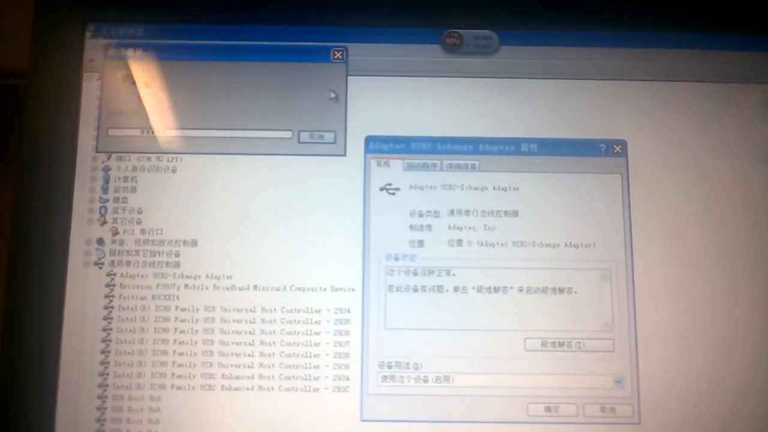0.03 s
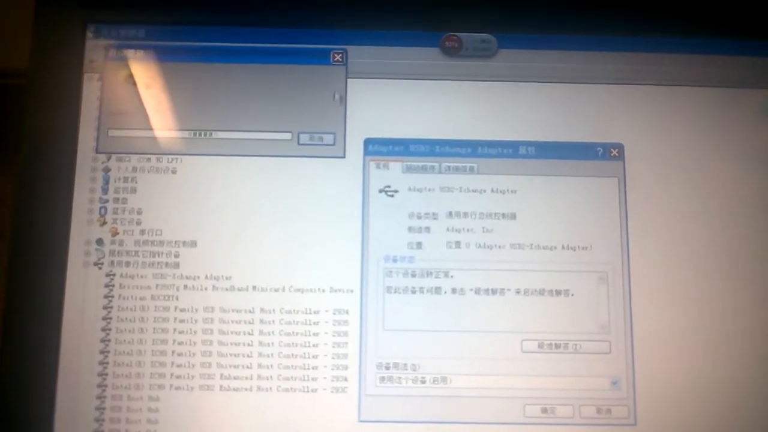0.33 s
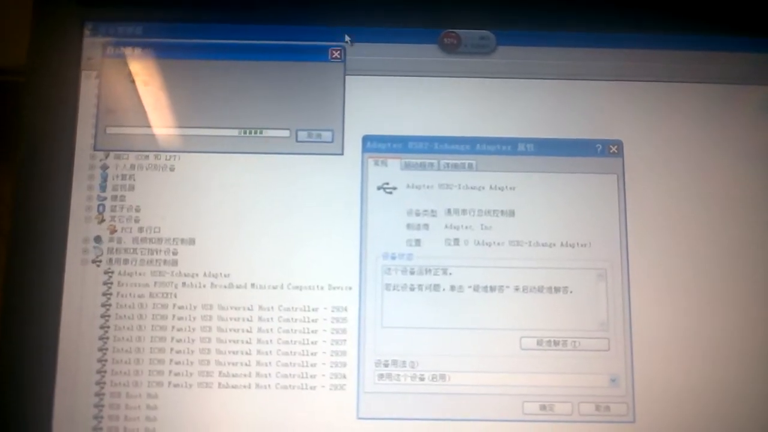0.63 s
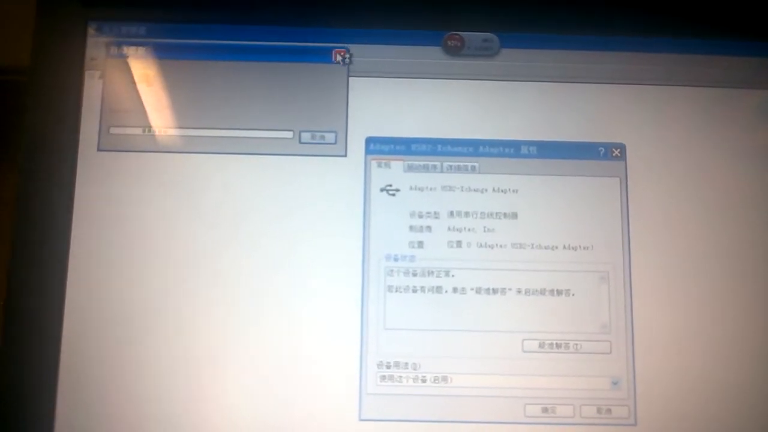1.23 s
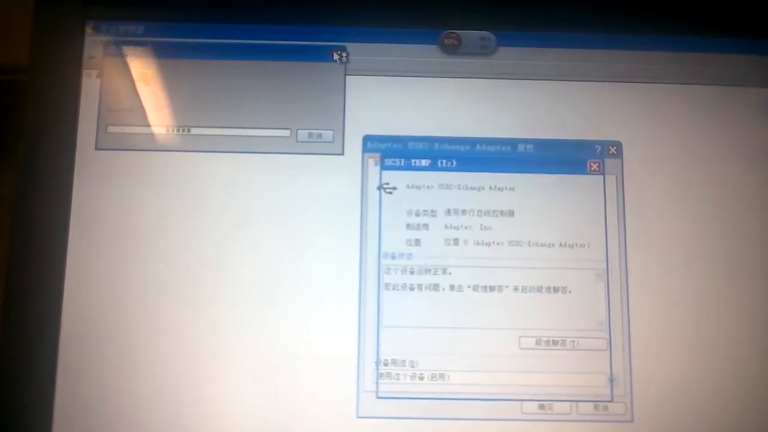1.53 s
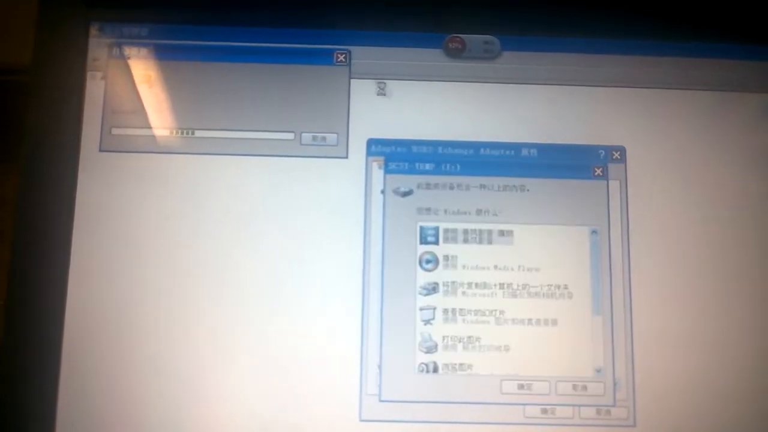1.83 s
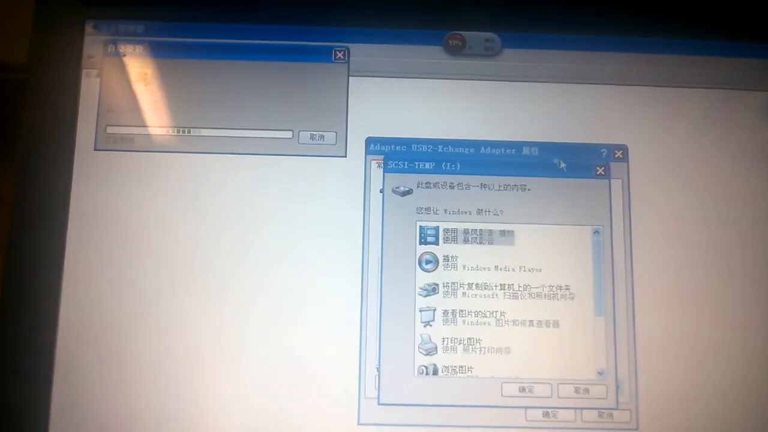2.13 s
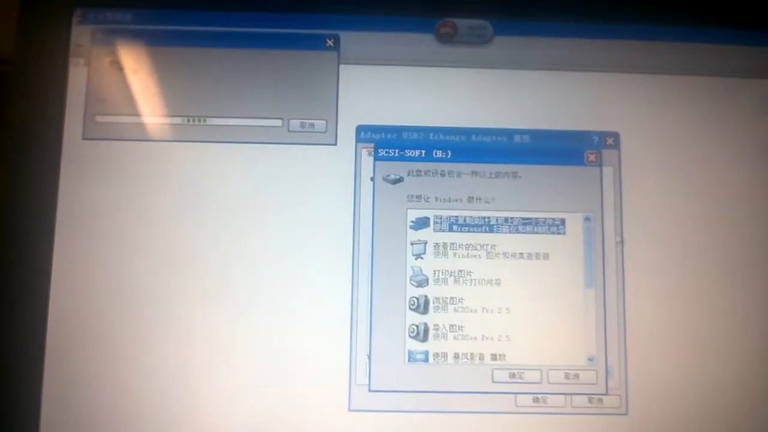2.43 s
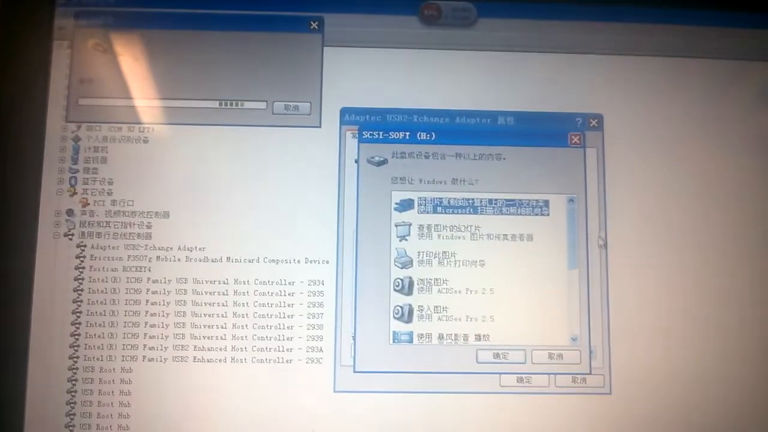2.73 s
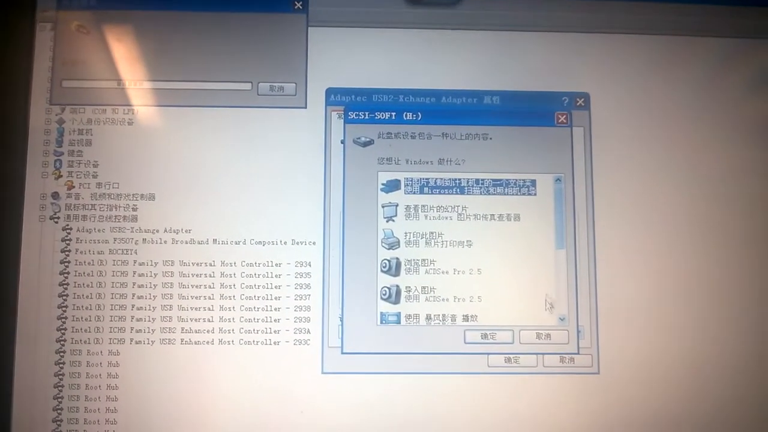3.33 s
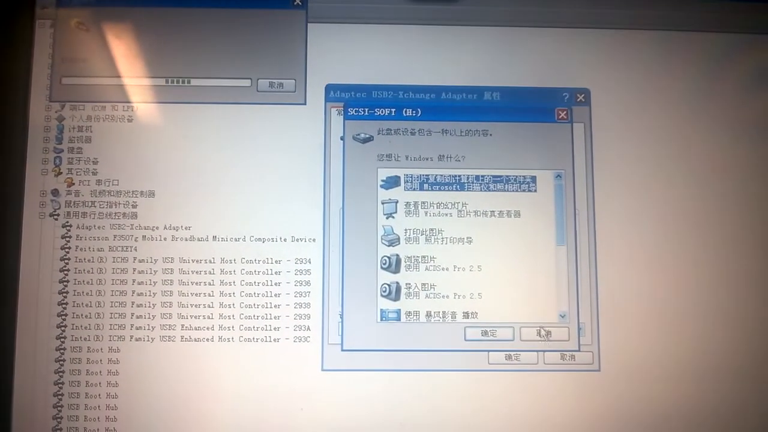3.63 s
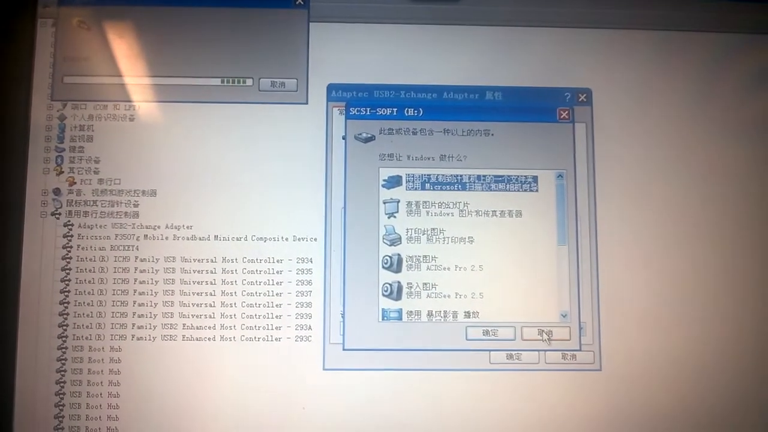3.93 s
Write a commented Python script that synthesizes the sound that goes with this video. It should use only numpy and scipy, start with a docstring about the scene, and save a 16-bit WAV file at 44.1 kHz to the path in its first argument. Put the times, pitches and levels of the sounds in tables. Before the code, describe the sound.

Computer hard disks spin with thin, pulsing whines over fan air and hum in a small room. One disk seeks in irregular rasping ticks with soft thumps, rests briefly, resumes, and ends in a dense, droning rattle.

```python
"""A computer with several hard disks runs in a small room: hum, fan air, thin beating spindle whines.
From the start one disk's heads seek in irregular bursts, each seek a tiny rasp and a soft case thump.
In the first half second something ticks, scuffs and squeaks thinly. Near 1.5 s the heads rest and
two faint clicks follow, the first with a soft knock. Scattered seeks resume at 2.1 s; from 3.6 s a
dense run shakes the case into a low drone."""
import sys
import numpy as np
from scipy import signal
from scipy.fft import rfft, irfft
from scipy.io import wavfile

SR = 44100
rng = np.random.default_rng(int(sys.argv[2]) if len(sys.argv) > 2 else 0)


def inscribe(sig):
    """Save sig as 16-bit PCM at rate SR to the path in sys.argv[1].

    A 1-D sig is mono; a 2-D sig holds one channel per row.
    Samples are clipped to [-1, 1] before scaling.
    """
    pcm = np.round(np.clip(np.atleast_2d(sig).T, -1, 1) * 32767)
    wavfile.write(sys.argv[1], SR, pcm.astype(np.int16))


N = 176400
T = np.arange(N) / SR
TURN_HZ, BAND_LIMIT_HZ = 90.18, 15720

# fan and platter air: freq_hz, density_db
AIR_SPECTRUM = [(20, -84.5), (45, -89), (90, -95.5), (210, -94), (280, -101), (450, -103), (620, -99),
                (780, -98), (950, -104), (1100, -102), (1800, -109), (2700, -108), (3300, -102),
                (3800, -94), (4150, -92.5), (4500, -100), (4900, -108), (5700, -110), (6400, -110),
                (7400, -108), (8000, -106), (9000, -106.5), (10000, -110), (11000, -112), (11800, -118),
                (13500, -114), (15500, -115.5)]
# throbbing hiss: freq_hz, gain_db
THROB_SPECTRUM = [(4500, -53), (5700, -13), (6400, -8), (7300, -10), (7700, -6), (9000, -47.5)]
# disks at nearly equal speed: beat_hz, swell_at_s, twin_gain_db, [(pitch_hz, level_db)]
WHINE_PAIRS = [(3.33, .017, -3.9, [(4058.15, -57.3), (4253.5, -71.5)]), (5.97, .073, -4.8, [(6912, -79.5),
               (7231, -78.5), (7304.68, -67.6), (7450, -79)]), (6.69, .055, -12, [(7973, -78.5),
               (8059, -77), (8116.3, -74.8)]), (2.08, .18, -8, [(8675.97, -69.2), (8927.9, -74.6)]),
               (8.05, .04, -13, [(9738, -80), (9834, -83)]), (10.84, .025, -13, [(9943, -84.5),
               (10020, -76.8)]), (5.26, .053, -12, [(6508, -81.5), (14610, -87)])]
# motor and bearing whines: pitch_hz, level_db
LONE_WHINES = [(2067, -85), (2790, -84.5), (2890, -86), (4870, -85), (6380, -83.5), (7607, -82.5),
               (10541, -83.5), (12139, -90.5), (12166, -89), (12242, -89.5), (12974, -91), (13076, -90),
               (14104, -91)]
# high harmonics of the platter rate: pitch_hz, level_db
OVERTONE_LEVELS = [(5500, -97), (7000, -91.5), (9300, -92), (11000, -96), (12500, -102), (13800, -96.5),
                   (15600, -98)]
# treble of the whir: time_s, gain_db
TREBLE_GAIN = [(0, 0), (.55, -1), (.7, 1), (.82, -1), (.89, -6), (.95, -2), (1.01, -6), (1.12, 0),
               (1.26, 1), (1.35, -6), (1.47, 0), (1.76, 0), (1.84, -8), (1.92, -1), (2.18, 0), (2.27, -2),
               (2.34, -7), (2.43, 0), (2.6, 2), (2.76, 1), (2.83, -8), (2.91, 1), (3.15, 2.5), (3.33, -1),
               (3.45, 1.5), (3.7, 2), (4, 0)]
# case drone: time_s, level_db
DRONE_ENVELOPE = [(0, -73), (.3, -63.5), (.55, -77), (1.1, -82), (1.35, -65), (1.55, -84), (3.58, -81),
                  (3.68, -63), (3.79, -61), (3.88, -61.5), (4, -83)]
# soft knock: start_s, level_db, pitch_hz, rise_s
SOFT_KNOCK = (1.462, -63, 76, .016)
# ticks and clicks: start_s, level_db, centre_hz, decay_s
CLICK_EVENTS = [(.0412, -49.5, 12000, .0014), (.05, -59.5, 10500, .016), (1.4778, -50.8, 2700, .0022),
                (1.6305, -56.5, 4600, .0013)]
# scuffing: time_s, level_db
SCUFF_ENVELOPE = [(0, -57), (.06, -52), (.16, -59), (.24, -54.5), (.31, -57.5), (.4, -60.5), (.5, -73)]
# scuffing: freq_hz, gain_db
SCUFF_SPECTRUM = [(1500, -21), (2500, -18.5), (3000, -6.5), (4200, 3.5), (5200, -11), (7000, -20),
                  (15000, -20)]
# thin squeaks: jitter_ratio, [(time_s, pitch_hz, level_db)]
SQUEAK_GLIDES = [(0.0244, [(.035, 4450, -63), (.062, 4680, -51.5), (.073, 4420, -47), (.08, 4360, -72)]),
                 (.022, [(.068, 4970, -68), (.1, 5000, -59), (.15, 4970, -78)]),
                 (0.0084, [(.295, 4000, -59), (.33, 3820, -57), (.358, 3670, -50.5), (.385, 3480, -56),
                 (.42, 3230, -61), (.432, 3240, -71)])]
# drive shell response: freq_hz, gain_db
SHELL_RESPONSE = [(150, -30), (330, -3.5), (420, -21), (530, -11.5), (800, -20), (1100, -11), (1550, -9.5),
                  (1800, -23.5), (2550, -19), (2850, -11.5), (3400, -9), (3900, -1.9), (4350, 4.1),
                  (4750, -12), (5300, -11.5), (5700, -20), (6450, -10), (7200, -19), (9000, -19),
                  (10900, -19), (11800, -24.5), (12600, -35), (13400, -33), (15500, -53)]
# ring of the braking arm: freq_hz, gain_db
ARM_RESPONSE = [(9000, -40), (12600, -24), (13300, -4), (13950, 0), (14450, -4), (15500, -9)]
# case modes: pitch_hz, gain_db, t60_s
CASE_MODES = [(125.1, -17.5, 0.18), (149.5, -20, 0.096), (186.5, 5, 0.06), (222, -3.5, 0.1),
              (291, -12, 0.065), (342, -15, 0.14)]
# head seeks: start_s, drive_db, thump_db
HEAD_SEEKS = [(0.0187, -52, -73), (0.0269, -51, -66), (0.048, -56.5, -63), (0.0591, -50, -53),
              (0.0707, -51, -60), (0.0953, -54, -51), (0.1128, -53, -60), (0.1243, -57, -64),
              (0.1368, -48, -61), (0.1474, -50, -53), (0.1813, -50, -58), (0.189, -57, -70),
              (0.2, -51, -60), (0.21, -51, -67), (0.2248, -49.5, -67), (0.234, -55, -68),
              (0.2442, -52, -49.5), (0.2643, -49.5, -53), (0.2815, -59, -56), (0.292, -54, -57),
              (0.332, -50.5, -50), (0.3464, -50, -51), (0.3718, -53, -72), (0.427, -48.5, -62),
              (0.4427, -52.5, -61), (0.4521, -49, -62), (0.4699, -50.5, -55), (0.4812, -49, -65),
              (0.5612, -52, -55.5), (0.5726, -55, -73), (0.6034, -52.5, -60), (0.6111, -53, -55),
              (0.654, -50.5, -58.5), (0.702, -52.5, -52), (0.744, -54, -62), (0.7665, -54, -59),
              (0.7867, -51, -71), (0.7945, -55, -74), (0.822, -51, -66), (0.8395, -52.5, -57),
              (0.8522, -49.5, -54), (0.907, -50, -53.5), (0.9716, -49, -54), (0.9809, -50.5, -53.5),
              (1.04, -50.5, -75), (1.154, -49, -73), (1.1621, -54, -53), (1.1778, -50, -60),
              (1.1859, -55, -57), (1.1976, -48.5, -75), (1.2216, -51.5, -78), (1.233, -49, -52.5),
              (1.245, -47.5, -66), (1.282, -51, -68), (1.289, -51, -61), (1.2984, -48.5, -55.5),
              (1.3413, -51.5, -65), (1.3713, -51, -59), (1.4039, -50.5, -50.5), (2.112, -54, -66),
              (2.1209, -49.5, -50.5), (2.311, -49.5, -52), (2.465, -51.5, -55.5), (2.4867, -51, -68),
              (2.4996, -49, -79), (2.5102, -51.5, -64), (2.7027, -49.5, -54.5), (2.7167, -50, -62),
              (2.7276, -52, -75), (2.7422, -48.5, -72), (2.7706, -50.5, -64), (2.8362, -53.5, -60),
              (2.8522, -55, -69), (2.8705, -51, -68), (2.8921, -51, -58), (2.9372, -51.5, -55),
              (3.3488, -48.5, -82), (3.3559, -50.5, -54), (3.6125, -48.5, -56), (3.6225, -51, -56),
              (3.6342, -48.5, -53), (3.6477, -51, -61), (3.6625, -48, -59), (3.675, -51.5, -59),
              (3.687, -47, -53), (3.7019, -48.5, -58), (3.7176, -50, -55), (3.7307, -50.5, -53),
              (3.7403, -48, -58), (3.7583, -47, -57), (3.782, -52, -67), (3.795, -48.5, -66),
              (3.8081, -49.5, -57), (3.8223, -46.5, -57), (3.8392, -48.5, -60), (3.8543, -51, -49.5),
              (3.873, -49.5, -57), (3.887, -52.5, -64), (3.9302, -49, -66), (3.9468, -49, -56)]


def amp(db):
    return 10 ** (np.asarray(db) / 20)


def db_at_hz(curve, hz):
    freq_hz, db = np.transpose(curve)
    return np.interp(np.log(hz + 1), np.log(freq_hz + 1), db)


def db_over_time(curve, **ends):
    return np.interp(T, *np.transpose(curve), **ends)


def add(mix, start_s, sound):
    part = mix[max(round(start_s * SR), 0):][:len(sound)]
    part += sound[:len(part)]


def wander(cutoff_hz):
    """Smooth random motion, unit RMS."""
    hz = np.fft.rfftfreq(N, 1 / SR)
    motion = irfft(rfft(rng.standard_normal(N)) / (1 + (hz / cutoff_hz) ** 4) * (hz > 0), N)
    return motion / np.sqrt(np.mean(motion ** 2) + 1e-20)


def colour(x, spectrum, size=4096):
    """Minimum-phase filter, unit energy."""
    log_gain = np.log(amp(db_at_hz(spectrum, abs(np.fft.fftfreq(size, 1 / SR)))))
    impulse = np.fft.ifft(np.exp(np.conj(signal.hilbert(log_gain)))).real[:size // 2]
    return signal.oaconvolve(x, impulse / np.linalg.norm(impulse))[:N]


def tone(pitch_hz, level_db, drift_hz=.04, delay_s=0):
    """Sinusoid with slight pitch drift."""
    cycles = pitch_hz * (T - delay_s) + np.cumsum(drift_hz * wander(4.5)) / SR
    return np.sqrt(2) * amp(level_db) * np.cos(2 * np.pi * cycles)


def room(x, gain_db=-2.5, t60_s=.15):
    """Short diffuse tail from the case and nearby walls."""
    t = np.arange(16384) / SR
    tail = rng.standard_normal(len(t)) * (t > .003) * np.exp(-np.log(1000) * t / t60_s)
    return amp(gain_db) * signal.oaconvolve(x, tail / np.linalg.norm(tail))[:N]


def fans(swell_db=.2, hiss_db=-77):
    """Even rush of air, a clean hum, and hiss throbbing at the second whine pair's beat."""
    air_gain = amp(db_at_hz(AIR_SPECTRUM, np.fft.rfftfreq(N, 1 / SR))) * np.sqrt(SR / 2)
    air = irfft(rfft(rng.standard_normal(N)) * air_gain, N) * amp(swell_db * wander(15.6))
    hiss = amp(hiss_db) * colour(rng.standard_normal(N), THROB_SPECTRUM)
    beat_hz, swell_at_s, _, _ = WHINE_PAIRS[1]
    throb = 1 + .9 * np.cos(2 * np.pi * beat_hz * (T - swell_at_s))
    hum = tone(pitch_hz=167.89, level_db=-54) * (1 + .02 * wander(20))
    return air + hiss * throb + hum


def spindles():
    """Whines flutter with each platter turn; paired disks beat against each other."""
    out = np.zeros(N)
    for beat_hz, swell_at_s, twin_gain_db, lines in WHINE_PAIRS:
        for pitch_hz, level_db in lines:
            faster = tone(pitch_hz, level_db, delay_s=swell_at_s)
            slower = tone(pitch_hz - beat_hz, level_db + twin_gain_db, delay_s=swell_at_s)
            out += (faster + slower) * (1 + .06 * wander(123))
    for pitch_hz, level_db in LONE_WHINES:
        out += tone(pitch_hz, level_db, drift_hz=3.16)
    return out * (1 + .07 * np.sin(2 * np.pi * TURN_HZ * T))


def platter_overtones(spread_db=3):
    """Comb of faint, uneven whistles at multiples of the turning rate."""
    lines_hz = np.arange(OVERTONE_LEVELS[0][0] // TURN_HZ, BAND_LIMIT_HZ // TURN_HZ) * TURN_HZ
    level_db = db_at_hz(OVERTONE_LEVELS, lines_hz) + spread_db * rng.standard_normal(len(lines_hz))
    bins = np.round(lines_hz * N / SR).astype(int)
    spectrum = np.zeros(N // 2 + 1, complex)
    spectrum[bins] = amp(level_db) * np.exp(2j * np.pi * rng.random(len(bins)))
    return irfft(spectrum, N) * N / np.sqrt(2)


def waver_treble(x, low_hz=6460, high_hz=10200):
    """The treble swells and dips briefly."""
    hz = np.fft.rfftfreq(N, 1 / SR)
    bandpass = 1 / (1 + (hz / high_hz) ** 20) - 1 / (1 + (hz / low_hz) ** 20)
    treble = irfft(rfft(x) * bandpass, N)
    return x + treble * (amp(db_over_time(TREBLE_GAIN)) - 1)


def case_drone():
    """The two lowest case modes boom, on an envelope timed to the long seek runs."""
    modes = sum(tone(pitch_hz, 0, drift_hz=4.63) for pitch_hz, _, _ in CASE_MODES[:2])
    return amp(db_over_time(DRONE_ENVELOPE)) * modes


def knock():
    """One soft, low bump."""
    start_s, level_db, pitch_hz, rise_s = SOFT_KNOCK
    age_s = np.maximum(T - start_s, 0)
    envelope = age_s / rise_s * np.exp(1 - age_s / rise_s)
    return amp(level_db) * envelope * np.sin(2 * np.pi * pitch_hz * age_s)


def clicks(rolloff_db_per_oct2=15):
    """Brief noise bursts with no ring."""
    out = np.zeros(N)
    hz = np.geomspace(200, 16000, 30)
    for start_s, level_db, centre_hz, decay_s in CLICK_EVENTS:
        burst = rng.standard_normal(N) * (T >= start_s) * np.exp(-abs(T - start_s) / decay_s)
        gain_db = -np.minimum(rolloff_db_per_oct2 * np.log2(hz / centre_hz) ** 2, 50)
        out += amp(level_db) * colour(burst, np.c_[hz, gain_db])
    return out


def scuff(flicker_db=1):
    """Light, uneven scuffing noise."""
    noise = colour(rng.standard_normal(N), SCUFF_SPECTRUM)
    return noise * amp(db_over_time(SCUFF_ENVELOPE, right=-140) + flicker_db * wander(90))


def squeaks(flicker_db=1.8):
    """Short, unsteady gliding tones."""
    out = np.zeros(N)
    for jitter_ratio, glide in SQUEAK_GLIDES:
        time_s, pitch_hz, level_db = np.transpose(glide)
        glide_hz = np.interp(T, time_s, pitch_hz) * (1 + jitter_ratio * wander(400))
        envelope = amp(np.interp(T, time_s, level_db, left=-140, right=-140) + flicker_db * wander(170))
        out += np.sqrt(2) * envelope * np.sin(2 * np.pi * np.cumsum(glide_hz) / SR)
    return out


def head_seeks(size=8192):
    """Each seek rasps the shell (push, brake), crackles as it settles, rings the arm, kicks the case."""
    push_lead_s, push_s, brake_s, brake_decay_s = .0021, .002, .002, .001
    corrections_per_s, settle_decay_s = 650, .015
    arm_lead_s, arm_rise_s, arm_decay_s = .0005, .0024, .0017
    recoil_delay_s, recoil_rise_s = .0005, .004
    t = np.arange(size) / SR
    push = amp(-1) * np.exp(-(t / push_s) ** 4)
    brake = np.exp(-np.maximum(t - brake_s, 0) / brake_decay_s)
    settle = amp(-10) * np.exp(-t / settle_decay_s) * np.sqrt(SR / corrections_per_s)
    ring = np.minimum(t / arm_rise_s, 1) * np.exp(-np.maximum(t - arm_rise_s, 0) / arm_decay_s)
    modes = sum(amp(gain_db) * np.exp(-np.log(1000) * t / t60_s) * np.sin(2 * np.pi * pitch_hz * t)
                for pitch_hz, gain_db, t60_s in CASE_MODES)
    recoil = np.minimum(t / recoil_rise_s, 1) * modes
    rasp, arm, thump = np.zeros((3, N))
    for start_s, drive_db, thump_db in HEAD_SEEKS:
        push_noise, brake_noise, arm_noise, settle_noise = amp(drive_db) * rng.choice([-1, 1], (4, size))
        corrections = rng.random(size) < corrections_per_s / SR
        add(rasp, start_s - push_lead_s, push_noise * push)
        add(rasp, start_s, brake_noise * brake)
        add(rasp, start_s + brake_s, settle_noise * settle * corrections)
        add(arm, start_s - arm_lead_s, arm_noise * ring)
        add(thump, start_s + recoil_delay_s, rng.choice([-1, 1]) * amp(thump_db) * recoil)
    return amp(-1.2) * colour(rasp, SHELL_RESPONSE), amp(-6.5) * colour(arm, ARM_RESPONSE), thump


def scene():
    """Whir, small noises and seeks with a little room; mono."""
    rasp, arm, thump = head_seeks()
    ticks = clicks()
    whir = waver_treble(fans() + spindles() + platter_overtones())
    seeking = rasp + arm + thump + case_drone()
    small_noises = scuff() + squeaks() + ticks + knock()
    reverb = room(rasp + .5 * ticks + .25 * arm)
    return (whir + small_noises + seeking + reverb)[None]


def record(dry):
    """Steep low-pass at the band limit."""
    lowpass = signal.firwin(1023, BAND_LIMIT_HZ, window=("kaiser", 9), fs=SR)
    return signal.oaconvolve(dry, lowpass[None], "same")


dry = scene()
out = record(dry)
inscribe(out)
```